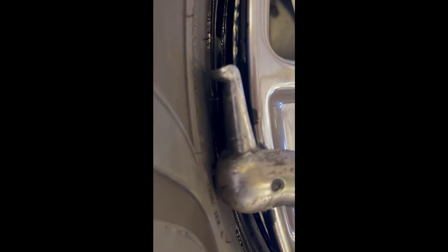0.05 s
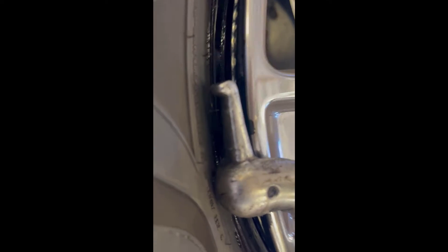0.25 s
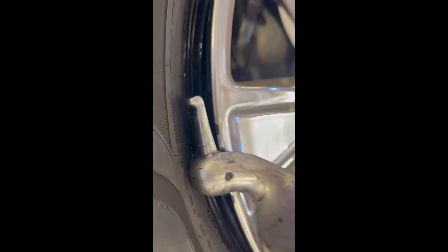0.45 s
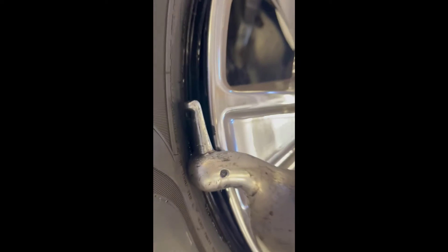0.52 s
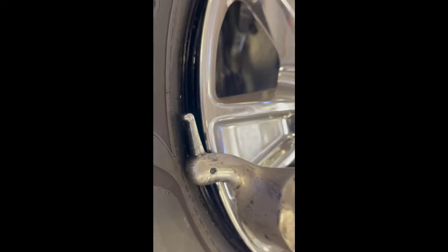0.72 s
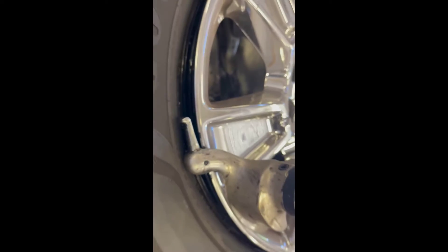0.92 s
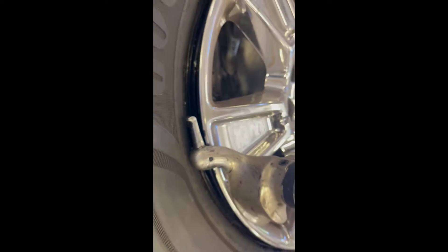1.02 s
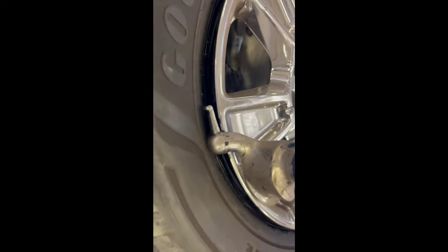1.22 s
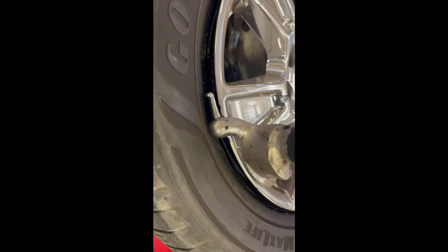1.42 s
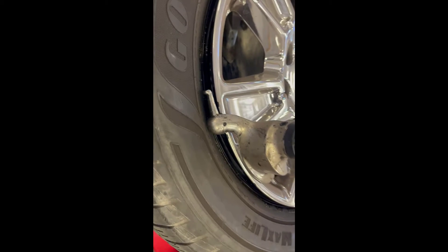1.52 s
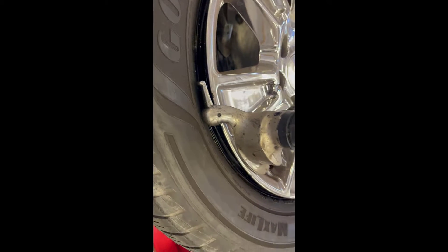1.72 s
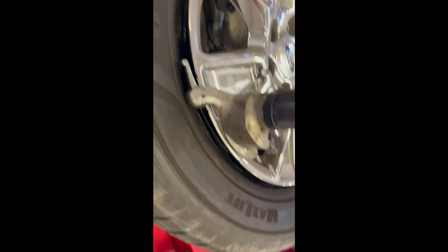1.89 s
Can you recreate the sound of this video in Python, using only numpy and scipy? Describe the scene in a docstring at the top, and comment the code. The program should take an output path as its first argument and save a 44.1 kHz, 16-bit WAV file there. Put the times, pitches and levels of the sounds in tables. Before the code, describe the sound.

Steel tool head clanks hard against an alloy wheel, with light clinks and a short rattle

```python
"""A light clink is still ringing over a low machine hum; the steel head of a tire changer has touched an alloy rim.
More light clinks lead to a heavy clank that rings the arm and the wheel, then a brief rattle.
Small ticks and soft bumps come before and after the clank, a scuff comes late, and a hard-walled workshop answers.
Metal notes are fading sines, clashes and thuds are fading coloured noise, and the hum is drifting sines."""
import sys
import numpy as np
from scipy import signal
from scipy.fft import rfft, irfft, next_fast_len
from scipy.io import wavfile
from scipy.ndimage import map_coordinates

SR = 44100
rng = np.random.default_rng(int(sys.argv[2]) if len(sys.argv) > 2 else 0)


def unload_audio(sound):
    """Save the sound as a 16-bit wav file, at the path given as the first command line argument."""
    columns = np.transpose(np.atleast_2d(sound))
    # keep every value between -1 and 1, then stretch to whole-number steps
    steps = np.round(np.clip(columns, -1, 1) * 32767)
    wavfile.write(sys.argv[1], SR, steps.astype(np.int16))


N = 85995  # length in samples

ATTACK_S, RING_ATTACK_S = 0.0014, 0.00098  # rise times of noisy hits and of ringing notes


def amp(db):
    """Turn decibels into a gain."""
    return 10 ** (np.asarray(db) / 20)


def unit(x):
    """Scale to an rms level of 1."""
    return x / np.sqrt(np.mean(x ** 2) + 1e-20)


def along(points, hz):
    """Read a curve of (Hz, value) points, with frequency on a log axis."""
    f, v = np.transpose(points)
    return np.interp(np.log(hz + 1), np.log(f + 1), v)


def since(s):
    """Seconds since a moment, zero before it."""
    return np.maximum(np.arange(N) / SR - s, 0)


def over_time(points):
    """Turn (seconds, dB) points into a gain for every sample."""
    s, db = np.transpose(points)
    return amp(np.interp(since(0), s, db))


def wobble(rate):
    """A smooth random curve through `rate` random knots a second."""
    knots = rng.standard_normal(size=400)
    grid = np.linspace(0, N * rate / SR, num=800)
    curve = map_coordinates(knots, [grid], mode="wrap")
    return np.interp(np.arange(N) * rate / SR, grid, curve)


def filtered(x, response):
    """Multiply the spectrum of x by a response that depends on frequency."""
    m = next_fast_len(N + SR // 2)
    spectrum = rfft(x, m) * response(np.fft.rfftfreq(m, 1 / SR))
    return irfft(spectrum, m)[..., :N]


# How much of a sound differs between the ears.
# Each row: frequency in Hz, level in dB of the differing part against the shared part.
EAR_DIFFERENCE = [(60, -28), (140, -24), (250, -18), (400, -8.5), (700, 0), (1500, -7), (3000, 0),
                  (6000, -3), (10000, -25)]


def noise(colour):
    """Coloured stereo noise of rms 1, a shared part plus a part of opposite sign at each ear."""
    def shape(hz):
        turn = np.arctan(amp(along(EAR_DIFFERENCE, hz)))
        return amp(along(colour, hz)) * [np.cos(turn), np.sin(turn)]

    mid, side = filtered(rng.standard_normal((2, N)), shape)
    return unit(np.array([mid + side, mid - side]))


def struck(s, attack, t60):
    """Envelope of a blow: a fast rise, then an exponential fall of 60 dB in t60 seconds."""
    t = since(s)
    return (1 - np.exp(-t / attack)) * amp(-60 * t / t60)


BLUR_S = 0.0259  # how often the room shifts a mode's phase


def mode(s, hz, t60, blur=0.47, spread=0.86):
    """One struck mode: a fading sine, its phase blurred by the room a little differently at each ear."""
    t = np.arange(SR)[:int(t60 * SR)] / SR
    knots = np.arange(64) * BLUR_S
    shared, apart = (np.interp(t, knots, k) for k in rng.standard_normal((2, len(knots))))
    # blur and spread are phase shifts in radians
    ear_shift = spread * amp(along(EAR_DIFFERENCE, hz)) * np.array([apart, -apart])
    phase = 2 * np.pi * (hz * t + rng.random()) + blur * shared + ear_shift
    tone = (1 - np.exp(-t / RING_ATTACK_S)) * amp(-60 * t / t60) * np.sin(phase)
    start = round(s * SR)
    tone = tone[:, max(-start, 0):N - start]  # a negative start leaves only the later part
    out = np.zeros((2, N))
    out[:, max(start, 0):][:, :tone.shape[1]] = tone
    return out


# How long the workshop rings. Each row: frequency in Hz, time in seconds to fall by 60 dB.
ROOM_T60 = [(100, 1), (400, 1), (1000, 0.74), (2500, 1.0), (5000, 1), (10000, 0.6)]
ROOM_BUILD_S = 0.0051  # how fast the room's answer builds up


def burst(s, colour, t60, room_db):
    """Densely packed modes, heard as noise dying fast, then the workshop's longer answer."""
    hz, t, z = signal.stft(noise(colour), SR, nperseg=256)
    age = np.maximum(t - s, 0)
    room_fall = amp(room_db - 60 * age / along(ROOM_T60, hz)[:, None])
    tail = room_fall * (1 - np.exp(-age / ROOM_BUILD_S))
    envelope = np.hypot(amp(-60 * age / t60), tail)
    sound = signal.istft(z * envelope, SR, nperseg=256)[1][:, :N]
    return sound * (1 - np.exp(-since(s) / ATTACK_S))


# The low machine hum. Each row: frequency in Hz, level in dB within the hum.
HUM = [(58.5, -8), (63.5, -0.5)]
# The hum swells and sinks. Each row: time in seconds, level in dB.
HUM_SWELL = [(0.0, -42), (0.026, -43), (0.248, -53.5), (0.412, -39), (0.716, -45.5), (0.726, -49),
             (1.036, -40), (1.134, -52), (1.248, -38), (1.33, -64), (1.374, -38.5), (1.694, -45.5),
             (1.726, -30), (1.818, -61), (1.846, -39), (1.95, -39)]
# Faint machine tones. Each row: frequency in Hz, level in dB.
WHINE = [(113, -60), (240, -65), (290, -64.5), (360.5, -58.5)]
# Colour of the room noise. Each row: frequency in Hz, relative level in dB per Hz.
AIR = [(20, -18), (48, -0.5), (70, -7.5), (93, -7.5), (125, -8), (167, -12), (230, -14), (290, -17.5),
       (363, -23), (420, -22), (620, -26.5), (1000, -38), (1250, -33), (1800, -32.5), (2400, -41),
       (3300, -48), (4400, -47.5), (6500, -59.5), (8000, -55), (11200, -49.5), (12400, -68), (15000, -85)]
AIR_DB, HUM_DRIFT = -45, 0.4  # room noise level; scale of the tones' phase drift in radians


def workshop():
    """A swelling low hum and faint machine tones, all sines of drifting phase, plus room noise."""
    def tone(hz, db):
        phase = 2 * np.pi * hz * since(0) + HUM_DRIFT * wobble(9.16)
        return amp(db) * np.sqrt(2) * np.sin(phase)  # the root of 2 makes the sine's rms 1

    hum = over_time(HUM_SWELL) * sum(tone(hz, db) for hz, db in HUM)
    whine = sum(tone(hz, db) for hz, db in WHINE)
    return hum + whine + amp(AIR_DB) * noise(AIR)


# The head rubs along the tire. Each row: time in seconds, level in dB before the unevenness.
RUB = [(0, -67), (.2, -63), (0.801, -54.5), (1.001, -56.5), (1.14, -60.5), (1.185, -52), (1.224, -53),
       (1.248, -64.5), (1.45, -67), (1.9, -68.5)]
# Colour of the rub. Each row: frequency in Hz, relative level in dB per Hz.
RUB_COLOUR = [(200, 7), (700, 1.5), (1050, -5), (1900, -1), (2900, -10), (4100, -5.5), (5500, -11.5),
              (6200, -22), (7500, -12.5), (11000, -22), (12500, -30)]


def rubbing():
    """A faint uneven rub, coloured noise that swells to a short scuff."""
    unevenness = amp(1.9 * wobble(100))
    return over_time(RUB) * unevenness * noise(RUB_COLOUR)


# Soft bumps of the tire. Each row: start in seconds, level in dB.
BUMPS = [(0.067, -39), (0.08, -35.5), (1.227, -36)]
# Colour of a bump. Each row: frequency in Hz, relative level in dB per Hz.
BUMP_COLOUR = [(40, 1), (130, 0.5), (230, 1), (330, -11.5), (500, -17.5), (700, -21), (1300, -25),
               (3000, -61), (8000, -68)]
BUMP_T60 = 0.11  # seconds
BUMP_HZ, BUMP_TONE_DB, BUMP_TONE_T60 = 214.7, 4.5, 0.12  # the tire's hollow note, dB within a bump


def bumps():
    """Each soft bump of the tire is a low noise burst and one hollow note."""
    out = np.zeros((2, N))
    for s, db in BUMPS:
        thump = burst(s, BUMP_COLOUR, BUMP_T60, room_db=-6)
        note = amp(BUMP_TONE_DB) * mode(s, BUMP_HZ, BUMP_TONE_T60)
        out += amp(db) * (thump + note)
    return out


# Small metal ticks. Each row: start in seconds, level in dB, pitch in Hz.
TICKS = [(0.141, -47, 2670), (0.333, -48, 7800), (0.978, -65, 8500), (1.028, -47, 8400), (1.036, -52, 8500),
         (1.102, -57, 7800), (1.3124, -65, 2800), (1.32, -57, 8000), (1.3234, -48, 4660),
         (1.4356, -59, 3900)]
# Treble roll-off shared by the ticks. Each row: frequency in Hz, level in dB.
TICK_BODY = [(5000, -1.5), (10500, -1.5), (13000, -15)]
TICK_ATTACK_S, TICK_T60 = 0.0013, 0.032  # seconds
TICK_OCTAVES = 0.33  # distance from the pitch at which a tick is 5 dB weaker


def ticks():
    """Each tick is a short metallic noise hit gathered around its pitch, before or after the clank."""
    out = np.zeros((2, N))
    for s, db, hz in TICKS:
        f = np.geomspace(500, 16000, num=30)
        band_db = along(TICK_BODY, f) - 5 * (np.log2(f / hz) / TICK_OCTAVES) ** 2
        band = np.column_stack([f, band_db])
        out += amp(db) * noise(band) * struck(s, TICK_ATTACK_S, TICK_T60)
    return out


# The head chatters in its play. Each row: start in seconds, level in dB.
RATTLES = [(0.4735, -32.5), (.482, -34.5), (.555, -41)]
# Colour of a rattle. Each row: frequency in Hz, relative level in dB per Hz.
RATTLE_COLOUR = [(300, -9), (1200, -20), (1900, 13.5), (3000, -13), (3700, 8), (5600, -1.5), (8000, -9),
                 (11000, -15), (13000, -57)]
# Notes of the loosely fitted head. Each row: frequency in Hz, level in dB within a rattle.
RATTLE_MODES = [(1848, -11), (1935, -6), (2060, -13), (2270, -9), (3520, -12), (3950, -11.5), (4400, -7),
                (5580, -10.5)]
RATTLE_T60, RATTLE_RING_T60 = 0.11, 0.26  # seconds, for the noise and for the notes


def rattles():
    """The head rebounds and chatters in its loose fit: noise bursts with short high notes."""
    out = np.zeros((2, N))
    for s, db in RATTLES:
        clatter = burst(s, RATTLE_COLOUR, RATTLE_T60, room_db=-11.5)
        notes = sum(amp(level) * mode(s, hz, RATTLE_RING_T60) for hz, level in RATTLE_MODES)
        out += amp(db) * (clatter + notes)
    return out


# The many fine upper modes of the rim.
# Each row: frequency in Hz, typical level in dB of each mode before scatter and hit strength.
SHIMMER = [(1500, -46), (2500, -41), (3000, -48.5), (3900, -45), (5600, -44), (7000, -47), (11000, -64)]
SHIMMER_T60, SHIMMER_SCATTER_DB = 0.4, 4.5  # fall time in seconds; random spread of the levels
SHIMMER_LIGHT_DB, SHIMMER_RATTLE_DB = -15, 27.5  # a light clink's level; boost on a rattle's own level


def shimmer(hits):
    """The rim's fine upper modes as 72 sines, excited anew by each (s, dB, roll-off Hz) hit."""
    modes = np.geomspace(1600, 11000, num=72) * np.exp(rng.normal(0, 0.012, size=72))
    t = np.arange(SR) / SR
    out = np.zeros((2, N))
    for s, db, top_hz in hits:
        level_db = along(SHIMMER, modes) + SHIMMER_SCATTER_DB * rng.standard_normal(len(modes))
        gain = amp(level_db) / (1 + (modes / top_hz) ** 4)
        tone = gain @ np.sin(2 * np.pi * (modes[:, None] * t + rng.random((len(modes), 1))))
        out += amp(db) * np.interp(since(s), t, tone, right=0) * struck(s, ATTACK_S, SHIMMER_T60)
    return out


def rim():
    """The last clink, the main blow and the first rattle stir the rim; harder contacts reach higher modes."""
    rattle_s, rattle_db = RATTLES[0]
    return shimmer([(CLINKS[-1][0], SHIMMER_LIGHT_DB, 4500),
                    (BLOWS[1][0], 0, 14000),
                    (rattle_s, rattle_db + SHIMMER_RATTLE_DB, 8000)])


# Clear notes of the head, arm and rim. Each row: frequency in Hz, level in dB in a light contact,
# level in dB in a heavy blow, time in seconds to fall by 60 dB.
METAL_MODES = [(139.4, -38.5, -27, 0.38), (220.7, -38.5, -18.5, 0.55), (237.4, -52, -19.5, 0.17),
               (277.6, -41, -20.5, 0.74), (308, -46, -22.5, 0.29), (345.2, -32.5, -12.5, 0.4),
               (367.3, -40, -17, 0.59), (519, -37.5, -27, 0.49), (581, -36, -28.5, 0.25),
               (699, -58.5, -28, 0.62), (823, -39, -21.5, 0.18), (895, -39, -14.5, 0.26),
               (937, -26, -18.5, 0.15), (1030, -46, -22.5, 0.27), (1078, -28.5, -33, 0.23),
               (1308.5, -34, -33, 0.41), (1400, -28, -41, 0.19), (1740, -46, -20.5, 0.18),
               (2220, -27, -47, 0.16)]


def ring(s, heavy):
    """The clear modes of the metal; a heavy blow favours the low ones."""
    out = np.zeros((2, N))
    for hz, light_db, heavy_db, t60 in METAL_MODES:
        out += amp(heavy_db if heavy else light_db) * mode(s, hz, t60)
    return out


# Light contacts; the first rings on from just before the start.
# Each row: start in seconds, ring level in dB, clash level in dB, both added to the basic levels.
CLINKS = [(-.1, 1.5, -8), (0.225, -19.5, -2), (.232, 0.5, -2)]
# Colour of a clink's clash. Each row: frequency in Hz, relative level in dB per Hz.
CLINK_COLOUR = [(100, -27), (300, -7.5), (700, -4), (950, 0.5), (1600, -5), (2300, -4.5), (3100, -12),
                (4000, -9.5), (5500, -22), (7000, -30), (10000, -43.5), (12500, -57.5)]
CLINK_DB, CLINK_T60 = -23.5, 0.124  # basic clash level; fall time in seconds


def clinks():
    """The head touches the rim lightly: clear ringing notes and a small noise burst."""
    out = np.zeros((2, N))
    for s, ring_db, clash_db in CLINKS:
        out += amp(ring_db) * ring(s, heavy=False)
        out += amp(CLINK_DB + clash_db) * burst(s, CLINK_COLOUR, CLINK_T60, room_db=-11.5)
    return out


# Heavy blows. Each row: start in seconds, ring level in dB, thud level in dB, clash level in dB,
# all added to the basic levels; the crack follows the clash level.
BLOWS = [(0.3504, -25, -8, -3), (.3572, -1, -2.5, 0), (.397, -19.5, -3, -16.5)]
# Colours of the arm's thud, the clash, and the first bite of steel on alloy.
# Each row: frequency in Hz, relative level in dB per Hz.
THUD_COLOUR = [(40, -25), (105, -4), (145, -4), (170, -14.5), (215, 0), (260, -1.5), (310, -1), (370, -4.5),
               (450, -10), (600, -10.5), (900, -15), (1500, -35), (4000, -61)]
CLASH_COLOUR = [(200, -7.5), (600, -0.5), (760, -1.5), (920, 9.5), (1130, -10), (1320, 8.5), (1550, -9.5),
                (2200, -2.5), (3100, -10.5), (3900, -5), (5500, -7.5), (7500, -16), (11000, -23.5),
                (12500, -30), (15000, -38)]
CRACK_COLOUR = [(300, 3), (700, 6), (1500, -3), (3000, -9), (4200, -2.5), (5500, -2), (7500, -4.5),
                (11000, -23), (13000, -29), (15000, -26)]
THUD_DB, CLASH_DB, CRACK_DB = -15, -17, -23  # basic levels
THUD_T60, CLASH_T60, CRACK_T60 = 0.2, 0.1, 0.048  # fall times in seconds


def clank():
    """The head lands hard: steel cracks and clashes, the arm thuds and everything rings."""
    out = np.zeros((2, N))
    for s, ring_db, thud_db, clash_db in BLOWS:
        out += amp(ring_db) * ring(s, heavy=True)
        out += amp(THUD_DB + thud_db) * burst(s, THUD_COLOUR, THUD_T60, room_db=-12.5)
        out += amp(CLASH_DB + clash_db) * burst(s, CLASH_COLOUR, CLASH_T60, room_db=-14)
        out += amp(CRACK_DB + clash_db) * noise(CRACK_COLOUR) * struck(s, ATTACK_S, CRACK_T60)
    return out


# How far the left side leads the right.
# Each row: frequency in Hz, lead in radians before it is faded out in the bass.
LEFT_LEAD = [(330, -1), (400, 0), (520, -2), (860, 1.16), (1290, -0.9), (1800, -1.03), (2600, 2.05),
             (5080, 3), (8200, 5), (11500, 8.5)]
MONO_BELOW_HZ = 350  # the lead fades out below here


def scene():
    """The two microphones hear every source slightly out of step, except in the bass."""
    background = workshop() + rubbing()
    small_sounds = bumps() + ticks() + rattles()
    sound = background + small_sounds + rim() + clinks() + clank()

    def out_of_step(hz):
        lead = along(LEFT_LEAD, hz) * hz ** 4 / (hz ** 4 + MONO_BELOW_HZ ** 4)
        return np.exp(1j * lead * np.array([[0.5], [-0.5]]))  # half the lead on each side

    return filtered(sound, out_of_step)


TOP_HZ = 15300  # band limit


def record(dry):
    """The recorder keeps nothing above its band limit."""
    return filtered(dry, lambda hz: hz < TOP_HZ)


dry = scene()
out = record(dry)
unload_audio(out)
```